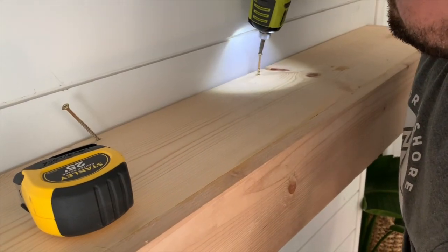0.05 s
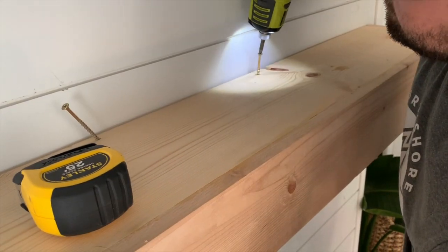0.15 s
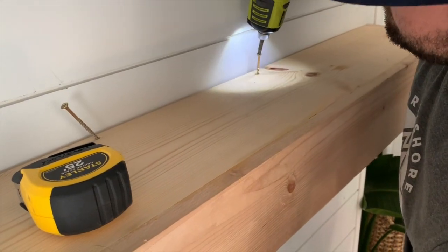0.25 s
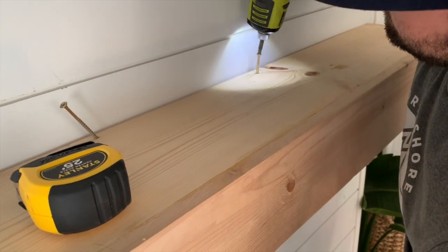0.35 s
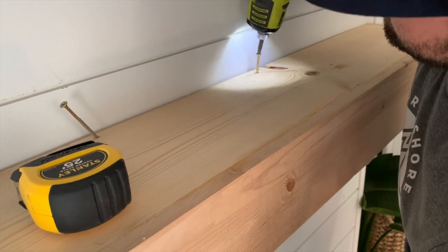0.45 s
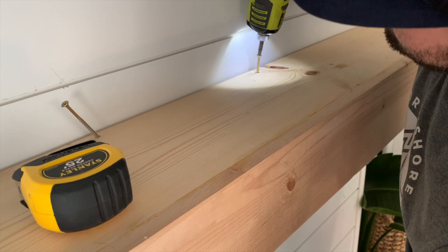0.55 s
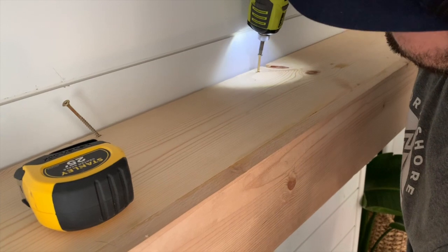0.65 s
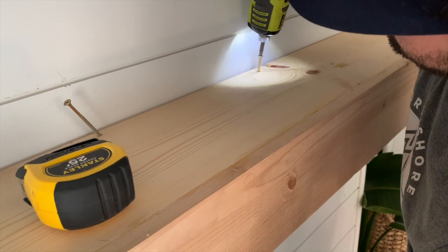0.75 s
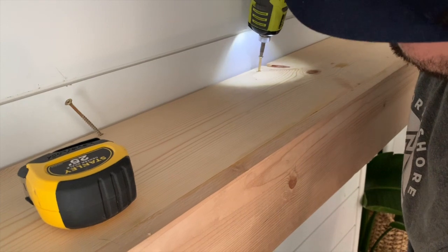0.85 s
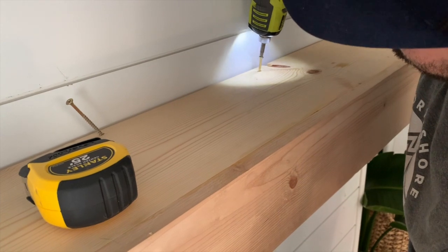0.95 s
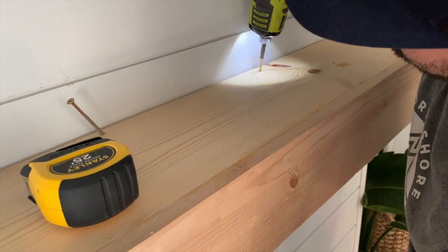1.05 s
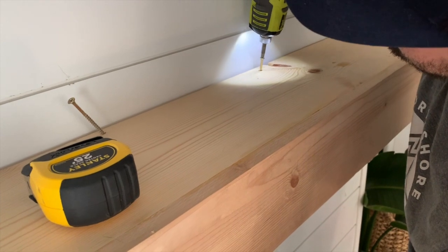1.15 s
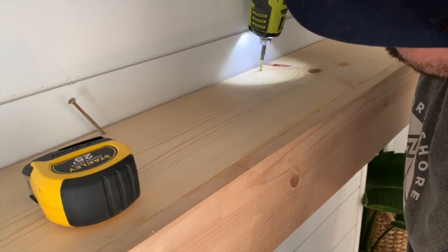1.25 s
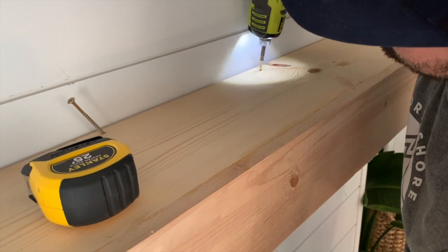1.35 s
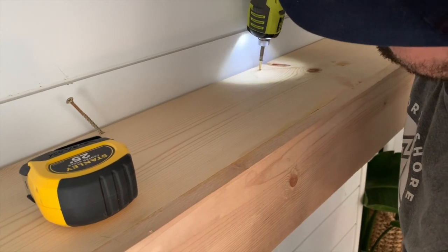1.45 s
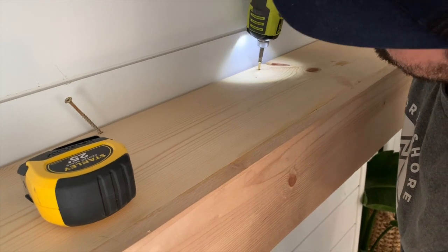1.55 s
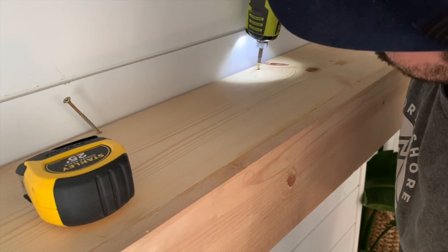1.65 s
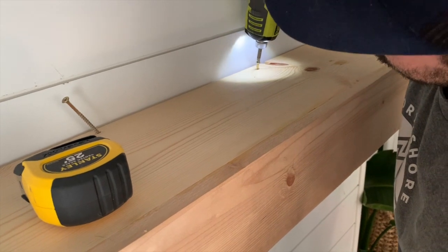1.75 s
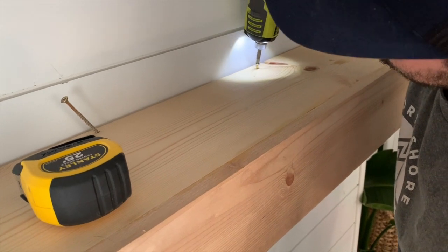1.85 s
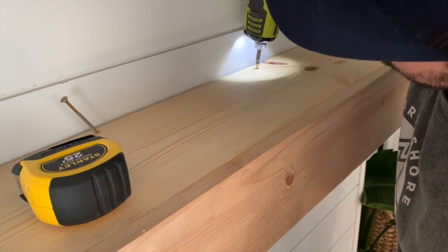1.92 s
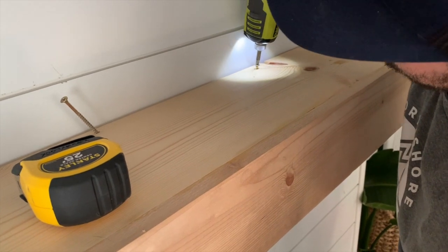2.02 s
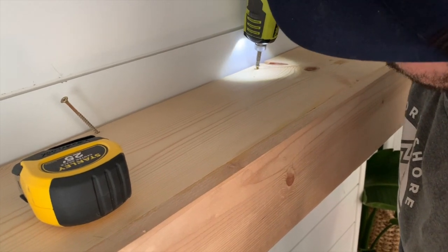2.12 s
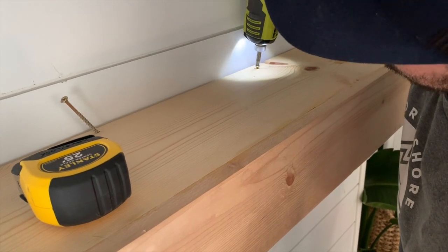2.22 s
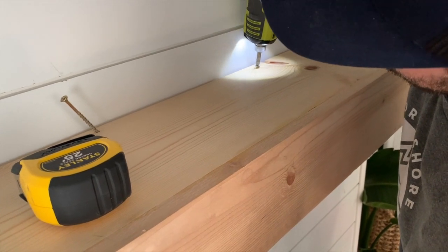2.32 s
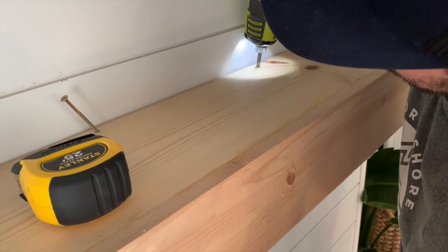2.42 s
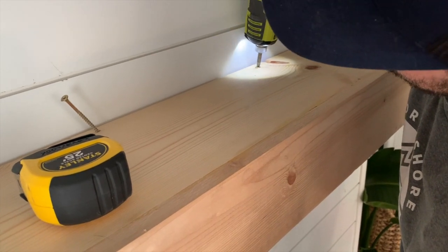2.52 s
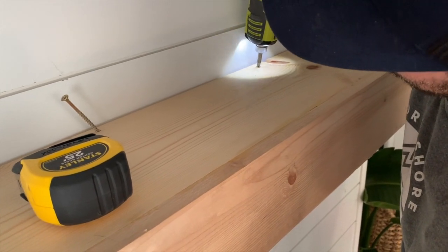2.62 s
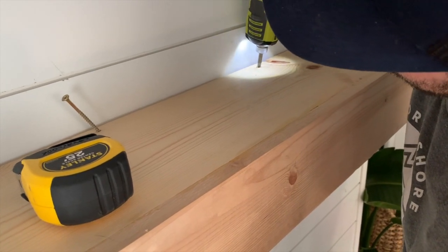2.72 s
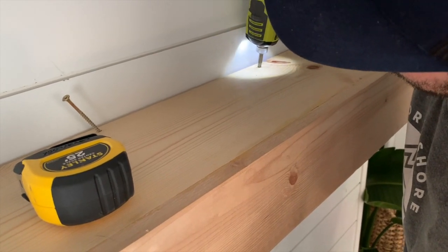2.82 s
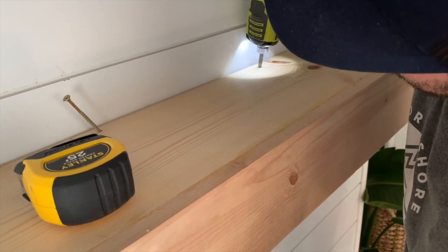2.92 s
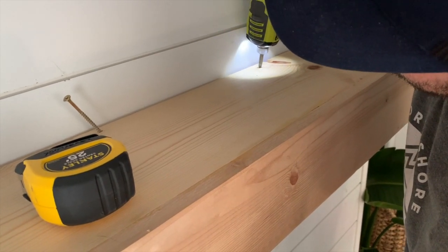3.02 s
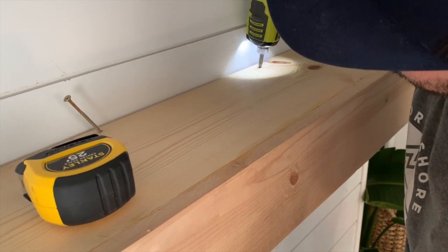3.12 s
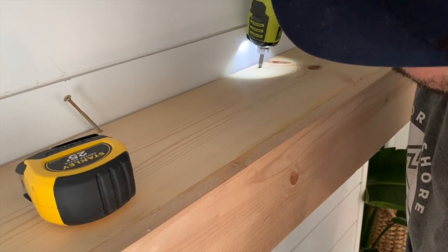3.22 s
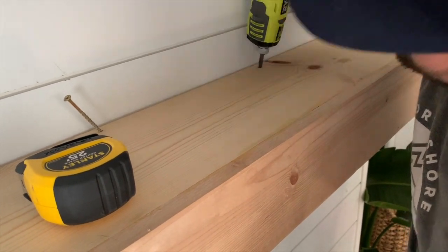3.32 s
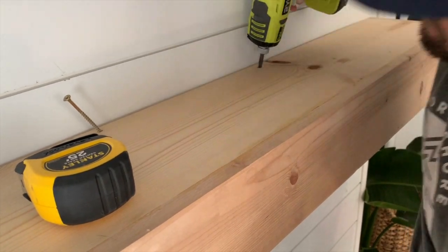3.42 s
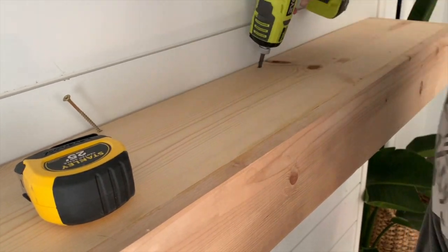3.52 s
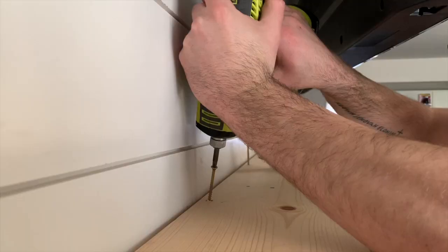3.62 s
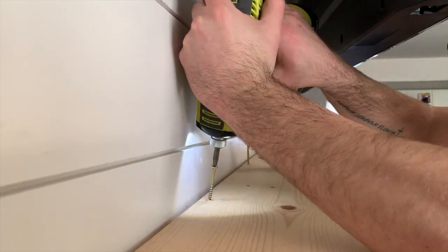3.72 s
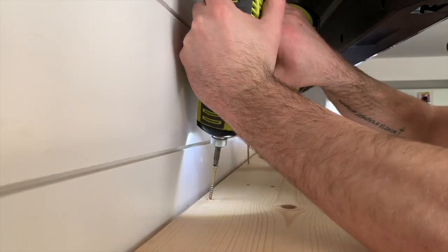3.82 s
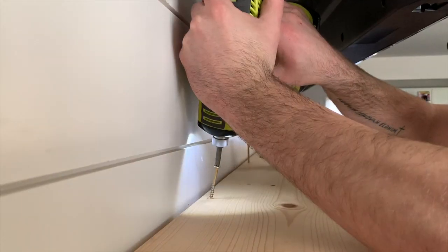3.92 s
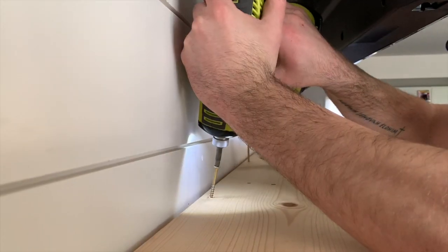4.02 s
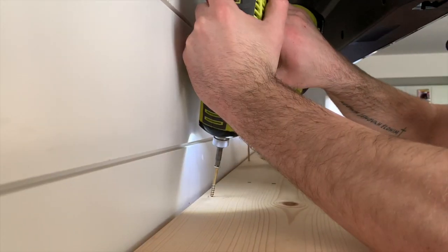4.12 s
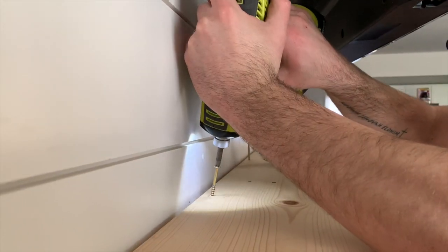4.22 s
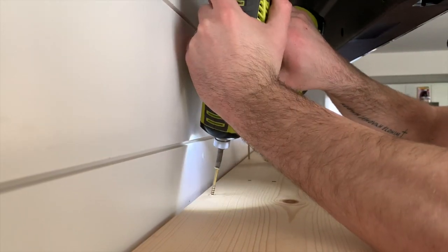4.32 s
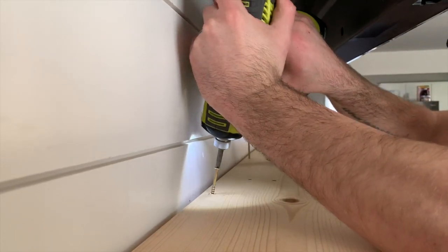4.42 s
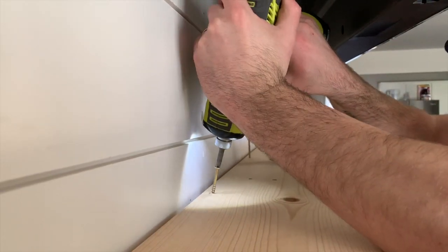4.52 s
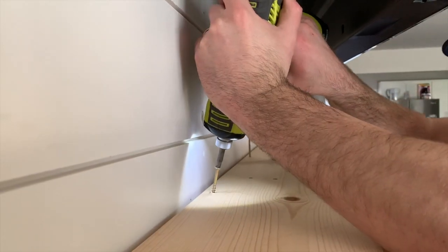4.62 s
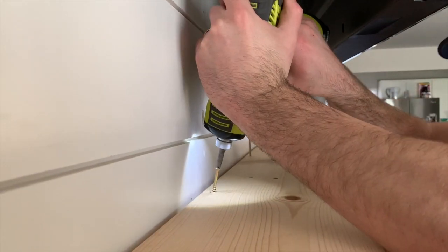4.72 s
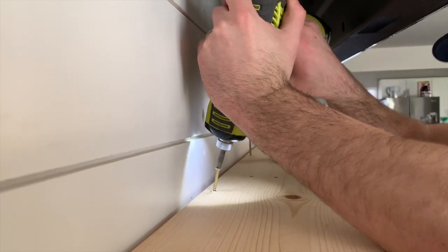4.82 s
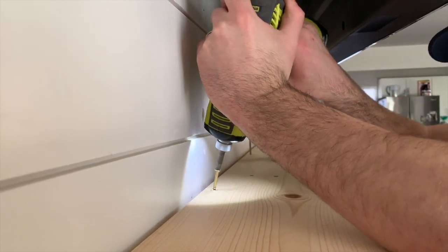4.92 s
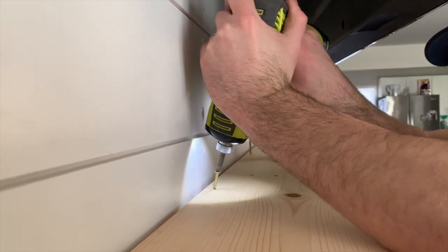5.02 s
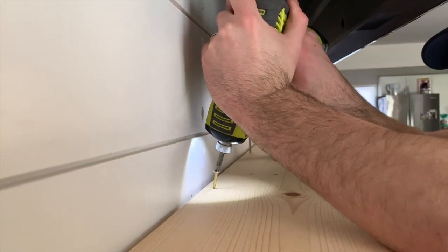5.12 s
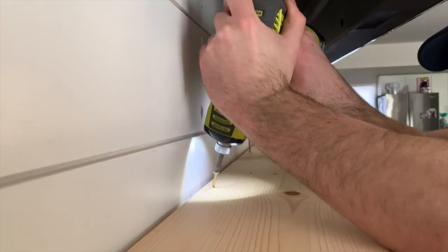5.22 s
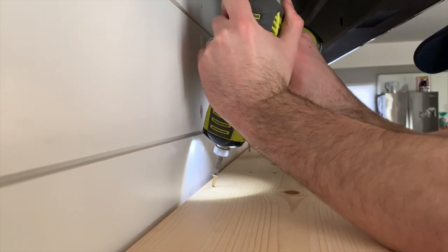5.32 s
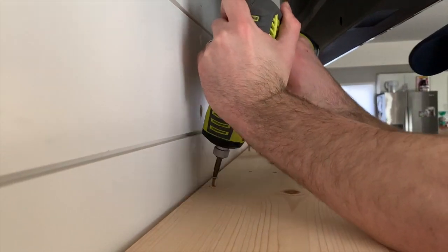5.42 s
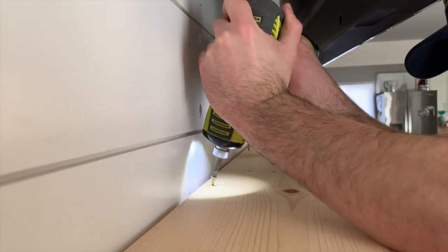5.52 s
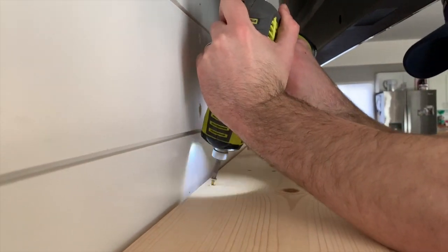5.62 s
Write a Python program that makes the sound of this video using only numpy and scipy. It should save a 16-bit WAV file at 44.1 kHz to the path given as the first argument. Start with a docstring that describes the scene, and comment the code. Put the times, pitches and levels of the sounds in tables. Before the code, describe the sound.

Close stereo sound in a small room with short reverberation. From the first instant a cordless driver runs at full throttle: a harsh geared growl with bright rattle and scraping, its pitch repeatedly sagging and springing back as the thread binds. The bit jumps with heavy metallic cracks and hollow wooden thumps, strong at 0.1 and from 0.5 to 1.2 s, easing until about 2 s, then chattering densely and ending in hard bangs around 3.0-3.2 s. The motor whirrs down; soft bumps and faint grip rubbing fill the lull. A thin high whine appears near 3.7 s. A second screw begins at 3.85 s with a low whirr, stepping higher at 4.2 s. Another slow squeeze comes at 4.55 s, surging at 4.8 s. Faster, fuller bursts follow at 5.15 and 5.5 s, with gear clacks, a deep wall boom and a last pair of knocks near 5.6 s.

```python
"""Small room with a wooden wall shelf: a cordless impact driver sinks two long screws.
First screw: the motor sags and recovers as the thread binds; the bit jumps in the head and knocks the shelf.
Second screw: short squeezes and deeper presses of the trigger, at differing speeds.
Rotor partials and random grains make motor and gears; struck modes make the shelf; a sine pair makes the
speed-control whistle; coloured noise makes the wall boom, the blows and the room tone."""
import sys
import numpy as np
from scipy import signal
from scipy.fft import rfft, irfft, next_fast_len
from scipy.io import wavfile
from scipy.ndimage import uniform_filter1d

SR = 44100
rng = np.random.default_rng(int(sys.argv[2]) if len(sys.argv) > 2 else 0)


def waveform_to_disk(signal):
    """Save audio, clipped to [-1, 1], as 16-bit WAV at the path in sys.argv[1]."""
    frames = np.transpose(np.atleast_2d(signal))
    scaled = np.clip(frames, -1, 1) * 32767
    samples = np.round(scaled).astype(np.int16)
    wavfile.write(sys.argv[1], SR, samples)


N = 249606
TIME = np.arange(N) / SR

# first screw, moments the bound thread gives: [start_s]
GIVES = [0.085, 0.44, 0.577, 0.735, 0.911, 1.069, 1.224, 1.386, 1.549, 1.70, 1.854, 2.016, 2.166, 2.297,
         2.411, 2.535, 2.638, 2.724, 2.816, 2.908, 3.004, 3.104]
# first screw, push on the tool: [time_s, push_db]
PUSH_FIRST = [(0.0, 0.5), (0.33, -3), (0.58, -0.5), (0.76, -3), (1.38, -3), (1.75, 0.5), (2.25, 0),
              (3.0, -1), (3.2, -10)]
# first screw, share of partials not yet broken into grit: [time_s, share]
CLARITY_FIRST = [(2.2, 1), (2.6, 0.7)]
# rotor partials, from the first multiple up: [relative_db]
PARTIALS_DB = [-4.5, 2.5, 1, 1.5, 4.5, 3.5, -2, 4, -1, 0, 3, -11, 1, -15, -8.5]
# housing and gear case resonances: [centre_hz, width_hz, lift_db]
HOUSING = [(470, 60, 4), (700, 35, 4), (873, 35, 4), (1120, 40, 3), (1308, 80, 3), (1706, 65, 3),
           (2050, 120, 4), (2255, 60, 3), (2486, 150, 2), (3421, 40, 6), (3655, 60, 4), (4123, 40, 5),
           (7497, 50, 3)]
# gear growl, first screw: [freq_hz, relative_db_per_hz]
GROWL_FIRST = [(450, -3.5), (600, -0.5), (720, -4), (880, -5.5), (1020, -5), (1400, -4.5), (1800, -8),
               (2100, -7.5), (2500, -7), (2760, -4), (3000, -35), (3600, -11.5)]
# gear growl, second screw: [freq_hz, relative_db_per_hz]
GROWL_SECOND = [(240, -6.5), (420, -1.5), (570, -6.5), (700, -1.5), (810, -7.5), (963, -0.5), (1190, -13.5),
                (1480, -6.5), (1850, -7), (2730, -12), (2990, -17.5), (3390, -12), (4200, -14.5),
                (4600, -23), (5980, -81)]
# gear rattle, first screw: [freq_hz, relative_db_per_hz]
RATTLE_FIRST = [(3000, 5), (3600, 2), (4800, 1), (6000, 7), (7300, 6.5), (8700, 1), (10500, 2), (16000, 4)]
# gear rattle, second screw: [freq_hz, relative_db_per_hz]
RATTLE_SECOND = [(3000, -4), (4200, 8.5), (5300, 2.5), (7400, 11.5), (8600, -6), (10500, 0.5), (16000, -1)]
# shelf rumble under the tearing thread: [freq_hz, relative_db_per_hz]
RUMBLE = [(76, -30), (125, 6), (162, 2.5), (227, 7), (262, 5.5), (295, -5), (351, -4.5), (409, -15.5),
          (477, -27), (521, -16), (600, -29.5), (780, -50.5), (1320, -120)]
# wall boom, first screw: [freq_hz, relative_db_per_hz]
BOOM_FIRST = [(25, -22.5), (50, -3.5), (72, -13.5), (95, -1.5), (125, -2.5), (180, -32.5), (300, -120)]
# wall boom, second screw: [freq_hz, relative_db_per_hz]
BOOM_SECOND = [(25, 6), (43, -11), (59, 4), (74, -5), (108, -16), (135, -10), (180, -14), (300, -120)]
# steel scraping in the screw head: [freq_hz, relative_db_per_hz]
SCRAPE = [(4000, -2.5), (7000, -7), (9000, -1.5), (12000, -8.5), (15500, -16.5)]
# bit slips in the screw head: [centre_s, db_above_rattle]
SLIPS = [(0.05, 0.5), (0.17, -26), (0.44, 4.5), (0.655, -9.5), (1.125, -6), (1.18, 0), (1.46, -4),
         (1.6, -8), (2.23, -12), (2.98, -10)]
# whistle against rotor speed: [speed_turns_per_s, relative_db]
WHISTLE = [(0, -55), (230, -43.5), (430, -34.5), (560, -47.5), (690, -59.5)]
# bit jumps: [start_s, force_db, hardness_db, crack_db, shelf_tilt_db_per_octave]
KNOCKS = [(0.073, -5.5, -7.5, -12, 0), (0.2, -22, -28, -45, 9), (0.266, -27, 2, -23.5, 14),
          (0.485, -7.5, -16, -13.5, -6.5), (0.579, -7.5, -10.5, -18.5, 0), (0.603, -14, -28, -44, -17),
          (0.744, -9, -0.5, -18.5, -3), (0.918, -7.5, -3, -18, -2), (1.208, -6, -5.5, -14.5, 5.5),
          (1.237, -14.5, -32, -35, -3.5), (1.62, -39, 26, -20.5, -3), (1.773, -30.5, 16, -30, -23),
          (1.923, -26.5, 7, -22, -19), (2.044, -25, 4, -24, 4.5), (2.101, -22.5, 4, -36, -3),
          (2.172, -23, -25, -36, 4), (2.238, -16.5, -1.5, -21, -8), (2.291, -14.5, -18, -37, 3),
          (2.343, -18, -10, -31.5, 2), (2.362, -19, 2.5, -20, -21), (2.418, -18.5, -5, -38, 4),
          (2.492, -16.5, -3.5, -19.5, 0), (2.526, -19.5, -18, -41, 5), (2.596, -16, 4, -18.5, 9),
          (2.632, -14.5, -29, -48, 4.5), (2.705, -19, 6.5, -17, 4), (2.73, -17.5, -3, -33, 9),
          (2.805, -14.5, 0, -19, 1), (2.817, -14, -12, -37, 6), (2.902, -11, -5.5, -22, 7.5),
          (2.988, -17.5, -2, -36, 9), (3.006, -4, 0, -14, -7.5), (3.078, -21.5, -14.5, -21, 4.5),
          (3.103, -4.5, -8, -5.5, -8), (3.203, -8.5, 5, -13, -3.5), (5.005, -24, -4, -39, 1),
          (5.036, -49, 11, -18, 21), (5.598, -19, 4.5, -14.5, -0.5), (5.62, -16, -2, -14.5, 3.5)]
# shelf modes: [freq_hz, relative_db]
SHELF = [(105, -5.5), (170, 7), (188, 4), (222, 5), (246, 3.5), (266, 2.5), (290, -3), (334, -6),
         (357, 2.5), (400, -11), (440, -5), (476, -14.5), (590, -18), (727, -17.5), (872, -16)]
# wooden clack: [freq_hz, relative_db_per_hz]
CLACK = [(310, 7), (490, 7.5), (595, -9.5), (859, -3.5), (983, -10), (1180, -8.5), (1320, 3.5), (1490, -10),
         (1700, -5), (2100, -15.5), (2730, -51), (4620, -120)]
# steel crack: [freq_hz, relative_db_per_hz]
CRACK = [(2000, 0.5), (3500, 9.5), (7000, 7), (11000, 7.5), (16000, -9)]
# chuck ring: [freq_hz, relative_db_per_hz]
CHUCK = [(2050, -33), (2300, 5.5), (2530, -4), (2750, -4), (3000, -36)]
# groan partials, from the first multiple up: [relative_db]
SKID_PARTIALS_DB = [-1, -12.5, -16.5, -24.5]
# bit ticks in the head or on the wood, and one tick of the hands on the grip at 3.782 s: [start_s, body_db,
# edge_db]
TICKS = [(0.16, -45, -37), (0.476, -8, -12), (0.906, -12, -10.5), (1.141, -16.5, -9.5), (1.312, -22, -50),
         (1.4592, -21, -17), (3.3124, -70, -45), (3.782, -50, -58)]
# tick body: [freq_hz, relative_db_per_hz]
TICK = [(500, 13), (1500, 13), (2400, 12.5), (2900, 16), (4000, -32)]
# unloaded gear whirr: [freq_hz, relative_db_per_hz]
FREEWHEEL = [(300, 17), (700, -0.5), (1600, 2), (3000, -10.5), (7000, -22), (11000, -32), (16000, -31)]
# soft bumps as the tool is lifted off and set down: [start_s, level_db]
BUMPS = [(3.304, -26), (3.381, -28), (3.714, -37.5)]
# bump: [freq_hz, relative_db_per_hz]
BUMP = [(45, 0), (90, -7), (160, -4), (350, -31), (700, -22)]
# bit set down on the second screw: one start_s, level_db
SET_DOWN = (3.69, -50)
# hands shifting on the grip: [centre_s, level_db]
RUBS = [(3.6, -59), (3.635, -60), (3.668, -56), (3.711, -52.5), (3.802, -60)]
# rubbing on the grip: [freq_hz, relative_db_per_hz]
GRIP_COLOUR = [(300, 2), (700, 4.5), (1500, -2.5), (4500, -11), (10000, -10)]
# second screw, trigger squeezed or pressed deeper: [start_s, release_s, asked_turns_per_s, spin_up_s]
SQUEEZES = [(3.837, 4.34, 233, 0.019), (4.193, 4.344, 408, 0.047), (4.536, 5.0, 230, 0.022),
            (4.811, 5, 562, 0.059), (5.137, 5.362, 680, 0.056), (5.489, 5.625, 625, 0.036)]
# second screw, push on the tool: [time_s, push_db]
PUSH_SECOND = [(3.85, -7), (3.96, -0.5), (4.01, 2.5), (4.15, -3.5), (4.25, 1), (4.58, -2), (4.68, 1),
               (4.85, 0.5), (5.66, 0)]
# second screw, wall boom as it bites: [time_s, relative_db]
BITE_SECOND = [(4.0, -31.5), (4.35, -29), (4.7, -26.5), (4.92, -22), (5.2, -23), (5.6, -21)]
# second screw, whistle lift: [time_s, relative_db]
WHISTLE_SECOND = [(3.7, 4), (3.9, 5.5), (4.2, 3.5), (4.45, 7), (4.65, 13), (4.9, 1.5)]
# gears taking up slack at a squeeze: [start_s, level_db]
GEAR_CLACKS = [(3.841, -42), (4.522, -42.5), (5.142, -24.5), (5.491, -13)]
# gear clack: [freq_hz, relative_db_per_hz]
GEAR_CLACK = [(300, 22), (700, 10), (1800, 5), (2900, 9), (3800, 2), (7000, -7), (15000, -16)]
# room tone: [freq_hz, relative_db_per_hz]
ROOM_TONE = [(15, -40.5), (25, 3), (70, -4), (229, -14), (503, -27), (695, -36), (988, -38), (2550, -37),
             (5140, -44.5), (7110, -46.5), (10100, -46), (16000, -61)]
# room decay: [freq_hz, t60_s]
ROOM_T60 = [(100, 0.52), (500, 0.44), (2000, 0.37), (6000, 0.29), (14000, 0.23)]
# left-right likeness of each source: [freq_hz, likeness]
LIKENESS = [(60, 0.91), (130, 1), (290, 0.88), (640, 0.42), (1400, 0.11), (3100, 0.067), (7000, 0.075)]
# balance, first screw: [freq_hz, left_minus_right_db]
BALANCE_FIRST = [(60, 2), (110, -0.5), (200, -0.5), (380, 3), (700, 4.5), (1290, 6), (2380, 1.5),
                 (4400, -4), (8120, -1.5), (15000, 1)]
# balance, second screw: [freq_hz, left_minus_right_db]
BALANCE_SECOND = [(60, -2), (110, 9), (200, -3.5), (380, 8.5), (700, 7.5), (1290, 2), (2380, 2),
                  (4400, -1.5), (8120, -1.5), (15000, 0.5)]
# microphone ports swinging in and out of phase in the treble: [freq_hz, likeness]
PORTS = [(6900, 0), (7700, -0.35), (8400, -0.97), (8900, -0.97), (9500, -0.4), (10300, 0.9), (11100, 0.9),
         (12000, 0.3), (13000, -0.95), (14000, -0.97), (15200, 0.7)]

FREE_TURNS_PER_S, LABOURING_TURNS_PER_S = 560, 440
SAG_TURNS_PER_S2, RECOVER_S = 880, 0.044
FIRST_RELEASE_S, FIRST_COAST_S = 3.19, 0.24
SECOND_TRIGGER_S, SECOND_COAST_S = 3.67, 0.1
# leaning presses the trigger deeper; the finger keeps closing, so pitch creeps up
TURNS_PER_S_PER_PUSH_DB, SQUEEZE_CREEP_TURNS_PER_S2 = 2, 65
# growl levels off above a knee; the rest grows as a power of speed
WORKING_TURNS_PER_S, GROWL_KNEE_TURNS_PER_S, GROWL_STEEPNESS = 579, 224.4, 4.3
RATTLE_POWER, RUMBLE_POWER, BOOM_POWER = 1.39, 0.64, 2.1
# gears growl more while speeding up, go slack on release
SPIN_UP_GROWL_DB, SLACK_DB_PER_S = 4, 134
# rotor turns per planet carrier turn; phase rock of each partial
GEAR_RATIO, CARRIER_ROCK_RAD = 7.5, 0.6
# planet turns per rotor turn; modulation depth of its uneven mesh
PLANET_SPIN, PLANET_DEPTH = 0.41, 0.85
SHELF_T60_S, WALL_T60_S = 0.52, 1
WALL_HZ, WALL_HUM_DB = 61, -6  # mean pitch; level relative to the boom
SLIP_S, RUB_S = 0.029, 0.012
CHAFE_GROWTH_DB_PER_S = 1.76  # as the first screw sinks
WHISTLE_IDLE_HZ, WHISTLE_LOADED_HZ = 7190, 6895
# dB of each knock part per dB of force, per dB of hardness
CLACK_PER_FORCE, RING_PER_FORCE = 0.8, 1.08
CLACK_PER_HARDNESS, RING_PER_HARDNESS = 0.38, 0.78
# as the first screw sinks, steel rings less and wood answers more
RING_DAMPING_DB_PER_S, CLACK_GROWTH_DB_PER_S = 3.5, 0.5
HOLD_DB_PER_FORCE = 1.98  # light knocks drive the shelf for less time
# typical values, varied per groan
SKID_START_HZ, SKID_END_HZ, SKID_GLIDE_S, SKID_HOLD_S = 420.5, 232.5, 0.01078, 0.03
ROOM_TONE_DB, CUTOFF_HZ = -48, 15800


def from_db(db):
    """Decibels to gain."""
    return 10 ** (np.asarray(db) / 20)


def rms_one(x):
    """Scale to unit power."""
    return x / np.sqrt(np.mean(x ** 2) + 1e-20)


def in_time(rows):
    """Each column of a curve at every sample."""
    s, *columns = np.transpose(rows)
    return [np.interp(TIME, s, c) for c in columns]


def at_hz(points, hz):
    """Read a table on a log-frequency axis."""
    f, value = np.transpose(points)
    return np.interp(np.log(np.maximum(hz, 1)), np.log(f), value)


def drift(rate_hz):
    """Smooth random wander, spread near 1, about `rate_hz` swings a second."""
    knots = rng.standard_normal(8000)
    return 1.3 * np.interp(TIME * rate_hz * 2, np.arange(len(knots)), knots)


def through(x, response):
    """Filter by a gain given as a function of frequency."""
    size = next_fast_len(x.shape[-1] * 5 // 4)
    hz = np.arange(size // 2 + 1) * SR / size
    return irfft(rfft(x, size) * response(hz), size)[..., :x.shape[-1]]


def colour(x, spectrum):
    """Shape by a spectrum that falls steeply past its ends; rms 1."""
    def response(hz):
        inside = np.clip(hz + 1, spectrum[0][0], spectrum[-1][0])
        octaves_out = np.abs(np.log2((hz + 1) / inside))
        return from_db(at_hz(spectrum, hz) - 150 * octaves_out)
    return rms_one(through(x, response))


def spread(pair):
    """Two unrelated signals to left and right: alike in the bass, apart in the treble."""
    mid = through(pair[0], lambda hz: np.sqrt(1 + np.clip(at_hz(LIKENESS, hz), -1, 1)))
    side = through(pair[1], lambda hz: np.sqrt(1 - np.clip(at_hz(LIKENESS, hz), -1, 1)))
    return np.array([mid + side, mid - side])


def noise(spectrum, size=N):
    """Coloured stereo noise, rms 1."""
    return colour(spread(rng.standard_normal((2, size))), spectrum)


def grains(per_s, size_db):
    """Random tiny contacts of uneven strength, in stereo."""
    born = rng.random(N) < per_s / SR
    strength = from_db(size_db * np.minimum(rng.exponential(1, N), 4))
    return spread(rng.standard_normal((2, N)) * born * strength)


def evened(x, seconds):
    """Hold the power near 1 over the given time."""
    power = uniform_filter1d(np.mean(x ** 2, axis=0), max(int(seconds * SR), 8))
    return x / np.sqrt(power + 1e-4)


def lingering(gain, t60_s):
    """Level that rises at once but falls no faster than the given decay."""
    fall_db = 60 * TIME / t60_s
    return from_db(np.maximum.accumulate(20 * np.log10(gain + 1e-9) + fall_db) - fall_db)


def add(out, s, sound):
    """Mix a short sound in at time s."""
    at = max(round(s * SR), 0)
    out[:, at:at + sound.shape[-1]] += sound[:, :N - at]


def binding_speed():
    """First screw: rotor slows while the thread binds, picks up when it gives; speed, time since release."""
    points = [(0.00069, (FREE_TURNS_PER_S + LABOURING_TURNS_PER_S) / 2)]
    for s in GIVES + [FIRST_RELEASE_S]:
        since, top = points[-1]
        sagged = max(top - SAG_TURNS_PER_S2 * (s - since), LABOURING_TURNS_PER_S)
        points += [(s, sagged), (s + RECOVER_S, FREE_TURNS_PER_S)]
    speed, = in_time(points)
    coasting = np.maximum(TIME - FIRST_RELEASE_S, 0)
    return speed * np.exp(-(coasting / FIRST_COAST_S) ** 2.4), coasting


def effort(speed, coasting, push_db, growl_db, rattle_db, rattle_follows, growl_slack_db_per_s):
    """Gains of gear growl and rattle, from speed and push."""
    spin = (speed / GROWL_KNEE_TURNS_PER_S) ** GROWL_STEEPNESS
    speeding_up = np.clip(np.gradient(speed) * SR / 8000, 0, 1)
    growl_db = growl_db + push_db + SPIN_UP_GROWL_DB * speeding_up - growl_slack_db_per_s * coasting
    rattle_db = rattle_db + rattle_follows * push_db - SLACK_DB_PER_S * coasting
    growl = spin / (1 + spin) * from_db(growl_db)
    rattle = (speed / WORKING_TURNS_PER_S) ** RATTLE_POWER * from_db(rattle_db)
    return growl, rattle


def rotor(turns, flutter_db, smear_rad):
    """Rotor partials, shaken in level and phase by gear play and rocked by the planet carrier."""
    out = np.zeros((2, N))
    for order, db in enumerate(PARTIALS_DB, 1):
        for side in out:
            carrier = 2 * np.pi * (turns / GEAR_RATIO + rng.random())
            rocking = CARRIER_ROCK_RAD * np.sin(carrier.astype(np.float32))
            phase = 2 * np.pi * (order * turns + rng.random())
            phase = phase + smear_rad * np.sqrt(order) * drift(60) + rocking
            level = from_db(db + flutter_db * np.minimum(drift(36), 1.2))
            side += level * np.sin(phase.astype(np.float32))
    return spread(out)


def housing(hz):
    """Gain of the tool's shell: each resonance lifts a narrow band."""
    return from_db(sum(db / (1 + (2 * (hz - centre) / width) ** 2) for centre, width, db in HOUSING))


def driver(speed, growl, rattle, growl_colour, rattle_colour, grit_db, whirr_db, chop, waver, clarity):
    """Motor and gears: uneven wood wavers the speed; fast speed changes break partials into grit."""
    # slow running wavers more
    unsteady = waver * WORKING_TURNS_PER_S / np.maximum(speed, GROWL_KNEE_TURNS_PER_S)
    turns = np.cumsum(speed * (1 + 0.0034 * drift(60) + unsteady * drift(14))) / SR
    change_turns_per_s2 = np.gradient(uniform_filter1d(speed, SR // 30)) * SR
    driven = clarity / np.sqrt(1 + (change_turns_per_s2 / 5500) ** 2)
    # planet gears add a partial on either side of each rotor partial
    meshing = 1 + PLANET_DEPTH * np.cos(2 * np.pi * PLANET_SPIN * turns + drift(15))
    tone = meshing * rotor(turns, flutter_db=5, smear_rad=.25)
    # contacts bunch once per rotor turn, swell with the planet carrier
    bunching = 1 + chop * np.cos(2 * np.pi * turns)
    bunching = bunching * (1 + 0.2 * np.cos(2 * np.pi * turns / GEAR_RATIO))
    gears = driven * evened(colour(tone, growl_colour), 0.11)
    grit = np.sqrt(from_db(grit_db) ** 2 + (1 - driven ** 2) / 2)
    gears += grit * colour(grains(3000, 2.7) * bunching, growl_colour)
    teeth = colour(grains(12000, 1.6) * bunching, rattle_colour)
    # high partials torn into a rough whirr
    torn = evened(colour(tone * drift(400), rattle_colour), 0.014)
    teeth += from_db(whirr_db) * driven * torn
    # each surge of the rotor is a little louder
    surge = np.clip(speed / (uniform_filter1d(speed, SR // 5) + 1), .5, 2) ** 0.77
    return through(surge * (growl * gears + rattle * teeth), housing)


def screw(speed, coasting, push_db, boom_colour, rumble_db, boom_db, rumble_follows, boom_follows):
    """Thread tears fibres in small slips, shaking shelf and wall; both ring on."""
    pace, biting_db = speed / WORKING_TURNS_PER_S, -SLACK_DB_PER_S * coasting
    rumble = pace ** RUMBLE_POWER * from_db(rumble_follows * push_db + biting_db)
    boom = np.minimum(pace, 1) ** BOOM_POWER * from_db(boom_follows * push_db + biting_db)
    wood = from_db(rumble_db) * evened(colour(grains(900, 1.1), RUMBLE), 0.31)
    wall = from_db(boom_db) * evened(noise(boom_colour), 0.1)
    return lingering(rumble, SHELF_T60_S) * wood + lingering(boom, WALL_T60_S) * wall


def scrape(rattle, db, patchy_db):
    """Bit chafes unevenly in the screw head, harder with effort, in bright spurts where it slips."""
    chafe = from_db(db + patchy_db * np.clip(drift(24), -2, 2))
    slips = sum(from_db(slip_db) * np.exp(-((TIME - s) / SLIP_S) ** 2) for s, slip_db in SLIPS)
    return rattle * (chafe + slips) * colour(grains(5000, 2.8), SCRAPE)


def whistle(speed, coasting, powered, level_db, octave_db, waver_db, tremble_hz):
    """Chopped current makes the windings sing while powered; under load the pitch drops and trembles."""
    load = uniform_filter1d((speed > 1) * np.exp(-(coasting / 0.14) ** 2), SR // 40)
    hz = WHISTLE_IDLE_HZ + (WHISTLE_LOADED_HZ - WHISTLE_IDLE_HZ) * load
    hz = hz + (6 + tremble_hz * load) * drift(90)
    db = level_db + np.interp(speed * load, *np.transpose(WHISTLE)) + waver_db * load * drift(9.6)
    phase = 2 * np.pi * np.cumsum(hz) / SR + np.array([[0], [np.pi / 2]])
    tone = np.sin(phase) + from_db(octave_db) * np.sin(2 * phase)
    return uniform_filter1d(powered * 1.0, SR // 50) * from_db(db) * tone


def swelled(spectrum, lead_s, lead_db, t60_s):
    """Noise scrape swells, then breaks into a dying blow at 50 ms."""
    age = TIME[:SR // 4] - .05
    lead = from_db(lead_db) * np.exp(-np.abs(age) / lead_s)
    after = np.maximum(age, 0)
    blow = (1 - np.exp(-after / 0.0005)) * from_db(-60 * after / t60_s)
    return evened(noise(spectrum, size=len(age)), 0.003) * (lead + blow)


def skid():
    """Bit judders over the screw head: short groan falling in pitch, varied every time."""
    age = TIME[:SR // 8]
    varied = np.exp(rng.normal(0, [.25, .08, .2]))
    glide_s, pitch, hold_s = np.array([SKID_GLIDE_S, 1, SKID_HOLD_S]) * varied
    hz = pitch * (SKID_END_HZ + (SKID_START_HZ - SKID_END_HZ) * np.exp(-age / glide_s))
    cycles = np.cumsum(hz) / SR
    groan = 0
    for order, db in enumerate(SKID_PARTIALS_DB, 1):
        level = from_db(db + rng.normal(0, 0.8))
        phase = 2 * np.pi * (order * cycles + rng.random()) + rng.normal(0, order / 4, (2, 1))
        groan = groan + level * np.sin(phase)
    return rms_one(groan) * (1 - np.exp(-age / 0.0013)) * np.exp(-(age / hold_s) ** 2)


def thump(bend_s, hold_s, t60_s, late_db, tilt_db):
    """Shelf modes driven, then ringing; low bending waves arrive last, tilt_db per octave brightens."""
    age, out = TIME[:SR // 3], 0
    lowest_hz, hold_hz = SHELF[0][0], SHELF[3][0]
    for hz, db in SHELF:
        since = np.maximum(age - bend_s * np.sqrt(lowest_hz / hz), 0)
        driven = np.exp(-(since / hold_s) ** 2 * hz / hold_hz)
        fade = (1 - np.exp(-since * hz)) * (driven + from_db(late_db - 60 * since / t60_s))
        phase = 2 * np.pi * (hz * rng.normal(1, 0.014) * since + rng.random())
        phase = phase + rng.normal(0, hz / 800, (2, 1))
        level = from_db(db + tilt_db * np.log2(hz / lowest_hz) + rng.normal(0, 1.2))
        out = out + level * fade * np.sin(phase.astype(np.float32))
    return out / np.sqrt(np.mean(out[:, :SR // 30] ** 2))


def knocks(thump_db, skid_db, clack_db, ring_db):
    """Bit rides out and slams back: steel crack, chuck ring, wooden clack, groan, shelf thump."""
    out = np.zeros((2, N))
    for s, force, hardness, crack, tilt in KNOCKS:
        driven_s = min(s, FIRST_RELEASE_S)
        ring = ring_db + RING_PER_FORCE * force + RING_PER_HARDNESS * hardness
        ring -= RING_DAMPING_DB_PER_S * driven_s
        clack = clack_db + CLACK_PER_FORCE * force + CLACK_PER_HARDNESS * hardness
        clack += CLACK_GROWTH_DB_PER_S * driven_s
        contact = from_db(crack) * swelled(CRACK, lead_s=0.004, lead_db=-18, t60_s=0.012)
        contact += from_db(ring) * swelled(CHUCK, lead_s=0.022, lead_db=-24.0, t60_s=0.049)
        contact += from_db(clack) * swelled(CLACK, lead_s=0.0043, lead_db=-1.0, t60_s=0.098)
        add(out, s - .05, contact)  # blow lands at s
        add(out, s, from_db(force + skid_db) * skid())
        hold_s = 0.036 * from_db(HOLD_DB_PER_FORCE * force)
        shelf = thump(bend_s=0.0035, hold_s=hold_s, t60_s=0.2, late_db=-7, tilt_db=tilt)
        add(out, s, from_db(force + thump_db) * shelf)
    return out


def first_screw():
    """Full throttle, binding and giving, the bit jumping in the head."""
    speed, coasting = binding_speed()
    push_db, = in_time(PUSH_FIRST)
    clarity, = in_time(CLARITY_FIRST)
    growl, rattle = effort(speed, coasting, push_db, growl_db=-33.0, rattle_db=-34.5,
                           rattle_follows=1.08, growl_slack_db_per_s=87)
    out = driver(speed, growl, rattle, GROWL_FIRST, RATTLE_FIRST, grit_db=-4, whirr_db=-4,
                 chop=0.3, waver=0.018, clarity=clarity)
    out += screw(speed, coasting, push_db, BOOM_FIRST, rumble_db=-24.5, boom_db=-27.0,
                 rumble_follows=0.6, boom_follows=0.072)
    out += scrape(rattle, db=-4.0 + CHAFE_GROWTH_DB_PER_S * TIME, patchy_db=2.0)
    out += freewheel(speed, coasting, db=-41)
    out += whistle(speed, coasting, TIME < FIRST_RELEASE_S, level_db=-3, octave_db=-11,
                   waver_db=3, tremble_hz=130)
    return out + knocks(thump_db=-4, skid_db=-6, clack_db=-9.5, ring_db=1.5)


def burst(spectrum, rise_s, t60_s):
    """Noise that swells quickly and dies away."""
    age = TIME[:SR // 4]
    return noise(spectrum, size=len(age)) * (1 - np.exp(-age / rise_s)) * from_db(-60 * age / t60_s)


def ticks(body_db, edge_db):
    """Light contacts at the bit, and one at the grip: a duller body and a short bright edge."""
    out = np.zeros((2, N))
    for s, body, edge in TICKS:
        add(out, s, from_db(body + body_db) * burst(TICK, rise_s=0.0058, t60_s=0.045))
        add(out, s, from_db(edge + edge_db) * burst(CRACK, rise_s=0.0011, t60_s=0.0087))
    return out


def freewheel(speed, coasting, db):
    """After release, unloaded gears and fan run down with a lumpy, falling whirr."""
    turns = np.cumsum(speed) / SR
    lumpy = (1 + 0.7 * np.cos(2 * np.pi * turns / GEAR_RATIO)) * from_db(1.5 * drift(20))
    gain = from_db(db) * (speed / WORKING_TURNS_PER_S) ** 0.75 * (1 - np.exp(-coasting / 0.08))
    whine = 0
    for order in (1, 2, 3, 4):
        phase = 2 * np.pi * (order * turns + rng.random())
        whine = whine + np.sin(phase.astype(np.float32)) / order
    return gain * lumpy * (0.8 * colour(grains(3000, 2), FREEWHEEL) + 0.55 * rms_one(whine))


def shelf_bumps():
    """Tool lifted off and set down: soft low noise bursts, plus shelf modes as the bit lands."""
    out = np.zeros((2, N))
    for s, db in BUMPS:
        add(out, s, from_db(db) * burst(BUMP, rise_s=0.0076, t60_s=0.24))
    s, db = SET_DOWN
    add(out, s, from_db(db) * thump(bend_s=0.0054, hold_s=0.06, t60_s=0.31, late_db=-2, tilt_db=9.0))
    return out


def grip():
    """Fingers rub the rubber handle: grains in short swells."""
    level = sum(from_db(db) * np.exp(-((TIME - s) / RUB_S) ** 2) for s, db in RUBS)
    return level * colour(grains(3000, 2.5), GRIP_COLOUR)


def squeezed_speed(push_db):
    """Second screw: rotor runs up to what the trigger asks, then coasts; speed, time since release."""
    speed, coasting = np.zeros(N), np.zeros(N)
    for start, release, asked, spin_up in SQUEEZES:
        at = int(start * SR)
        since = TIME[:N - at]
        coasting[at:] = np.maximum(TIME[at:] - release, 0)
        wanted = asked + TURNS_PER_S_PER_PUSH_DB * push_db[at:] + SQUEEZE_CREEP_TURNS_PER_S2 * since
        run_up = wanted + (speed[at] - wanted) * np.exp(-(since / spin_up) ** 1.5)
        speed[at:] = run_up * np.exp(-(coasting[at:] / SECOND_COAST_S) ** 2)
    return speed, coasting


def wall_hum(speed, coasting, wall_db):
    """Turning screw keeps the wall's main mode humming, unsteady in pitch and level."""
    pace = np.minimum(speed / WORKING_TURNS_PER_S, 1)
    drive = lingering(pace ** BOOM_POWER * from_db(-SLACK_DB_PER_S * coasting), 0.53)
    phase = 2 * np.pi * np.cumsum(WALL_HZ * (1 + 0.06 * drift(9))) / SR
    return drive * from_db(wall_db + WALL_HUM_DB + 1.5 * drift(12)) * np.sqrt(2) * np.sin(phase)


def second_screw():
    """Short squeezes at differing speeds; the wall boom grows as the thread bites."""
    push_db, = in_time(PUSH_SECOND)
    wall_db, = in_time(BITE_SECOND)
    whistle_db, = in_time(WHISTLE_SECOND)
    speed, coasting = squeezed_speed(push_db)
    growl, rattle = effort(speed, coasting, push_db, growl_db=-25.5, rattle_db=-26.5,
                           rattle_follows=1.7, growl_slack_db_per_s=52)
    out = driver(speed, growl, rattle, GROWL_SECOND, RATTLE_SECOND, grit_db=-2.8, whirr_db=-5,
                 chop=0.3, waver=0.014, clarity=1)
    out += screw(speed, coasting, push_db, BOOM_SECOND, rumble_db=-31, boom_db=wall_db - 1,
                 rumble_follows=1.0, boom_follows=0.78)
    out += wall_hum(speed, coasting, wall_db)
    out += scrape(rattle, db=-5.5, patchy_db=1.5) + freewheel(speed, coasting, db=-41)
    # stays powered between squeezes
    return out + whistle(speed, coasting, TIME > SECOND_TRIGGER_S, level_db=whistle_db, octave_db=-10,
                         waver_db=5.0, tremble_hz=30.2)


def gear_clacks():
    """Gears take up their slack at a squeeze: sharp noise bursts."""
    out = np.zeros((2, N))
    for s, db in GEAR_CLACKS:
        add(out, s, from_db(db) * burst(GEAR_CLACK, rise_s=0.0005, t60_s=0.03))
    return out


def room(x, near_db, tail_db):
    """Close reflections off wall and shelf, then a soft tail that dies sooner in the treble."""
    age, edges_hz = TIME[:SR * 3 // 4], np.geomspace(80, 16000, 9)
    white, tail = spread(rng.standard_normal((2, len(age)))), 0
    for low, high in zip(edges_hz, edges_hz[1:]):
        band = signal.sosfilt(signal.butter(2, [low, high], "band", fs=SR, output="sos"), white)
        tail = tail + band * from_db(-60 * age / at_hz(ROOM_T60, np.sqrt(low * high)))
    near = spread(rng.standard_normal((2, len(age)))) * from_db(-60 * age / 0.036) * (age > .002)
    echo = from_db(near_db) * rms_one(near) + from_db(tail_db) * rms_one(tail * (age > .012))
    return x + signal.fftconvolve(x, echo / np.sqrt(len(age)), axes=1)[:, :N]


def ports(x):
    """Microphone pair favours the sum or difference of its ports, by frequency."""
    mid = through((x[0] + x[1]) / 2, lambda hz: np.sqrt(1 + at_hz(PORTS, hz)))
    side = through((x[0] - x[1]) / 2, lambda hz: np.sqrt(1 - at_hz(PORTS, hz)))
    return np.array([mid + side, mid - side])


def scene():
    """Two screws, each with its own left-right balance, in the room over its tone; all knocks, even the second
    screw's, take the first screw's balance."""
    dry = ticks(body_db=4, edge_db=-1.5) + shelf_bumps() + grip() + gear_clacks()
    for sound, balance in ((first_screw(), BALANCE_FIRST), (second_screw(), BALANCE_SECOND)):
        dry = dry + through(sound, lambda hz: from_db(at_hz(balance, hz) * np.array([[.5], [-.5]])))
    return room(dry, near_db=-1.5, tail_db=-15.0) + from_db(ROOM_TONE_DB) * noise(ROOM_TONE)


def record(dry):
    """Microphone loses the deepest bass, rounds off the loudest knocks and cuts the top."""
    dry = signal.sosfilt(signal.butter(4, 39, "high", fs=SR, output="sos"), ports(dry))
    rounded = dry / (1 + (dry / 0.98) ** 4) ** (1 / 4)
    return signal.sosfilt(signal.ellip(10, .1, 80, CUTOFF_HZ, fs=SR, output="sos"), rounded)


dry = scene()
out = record(dry)
waveform_to_disk(out)
```